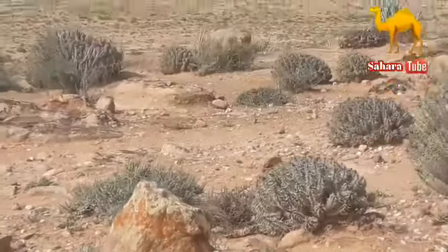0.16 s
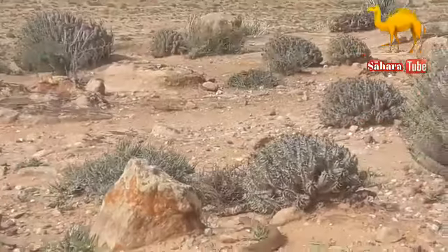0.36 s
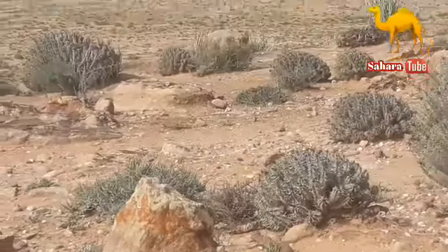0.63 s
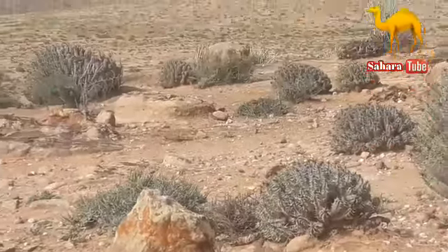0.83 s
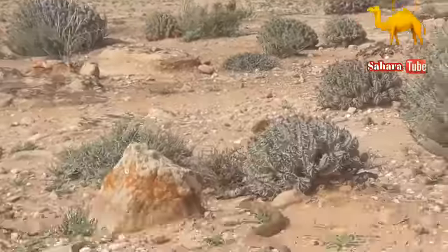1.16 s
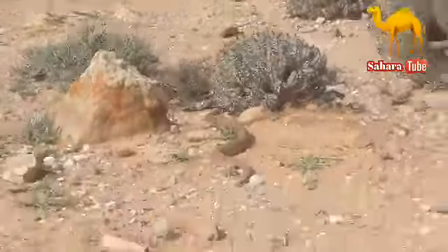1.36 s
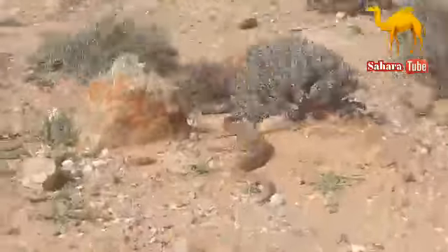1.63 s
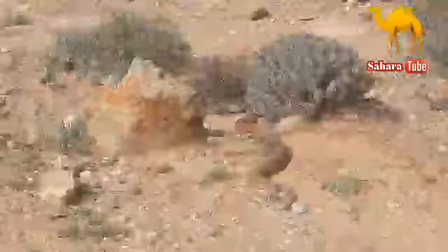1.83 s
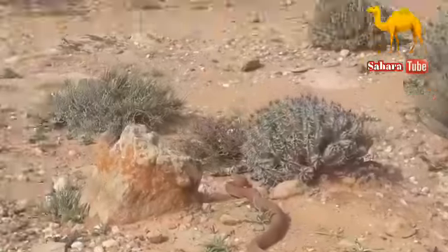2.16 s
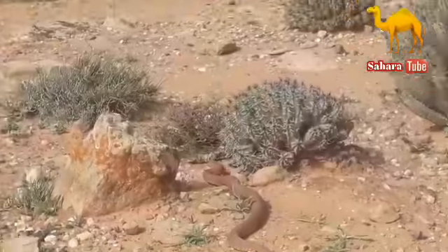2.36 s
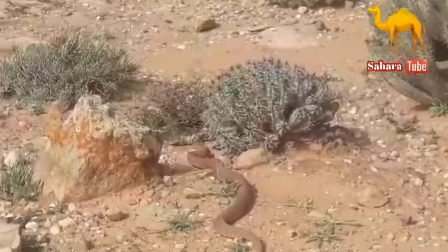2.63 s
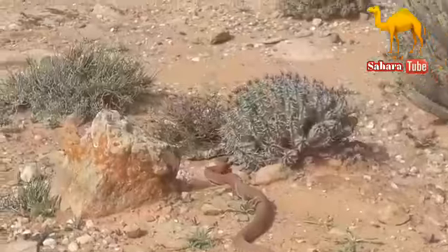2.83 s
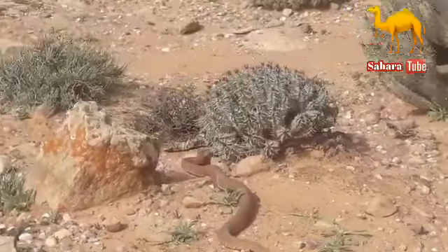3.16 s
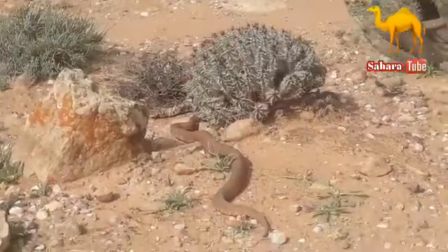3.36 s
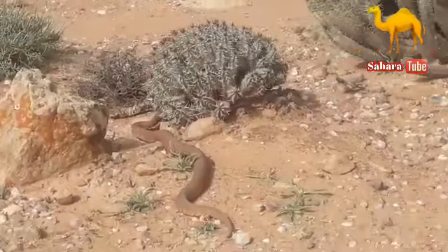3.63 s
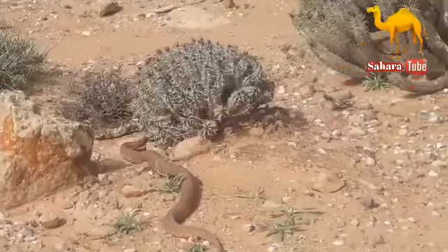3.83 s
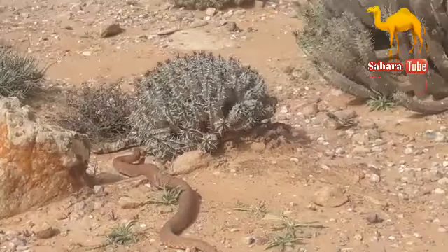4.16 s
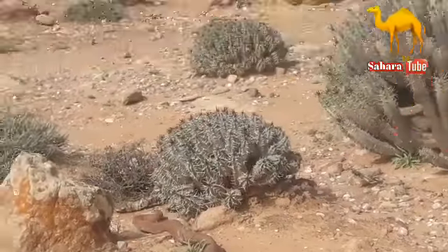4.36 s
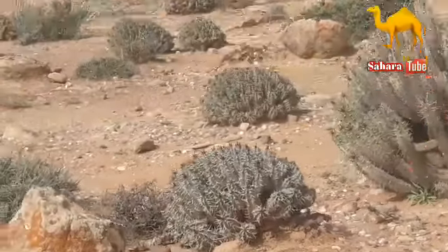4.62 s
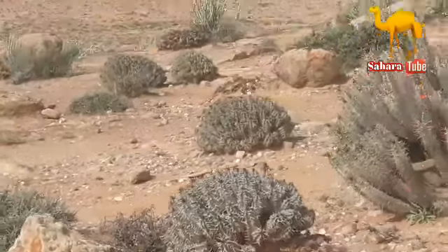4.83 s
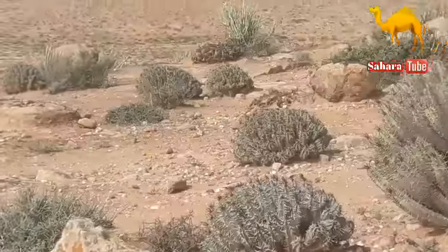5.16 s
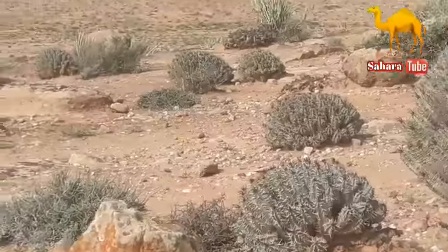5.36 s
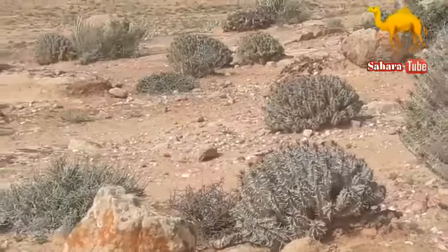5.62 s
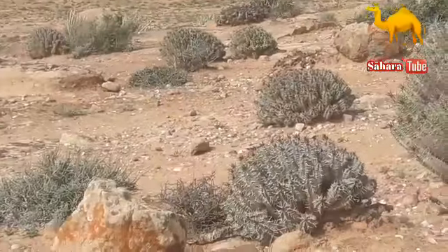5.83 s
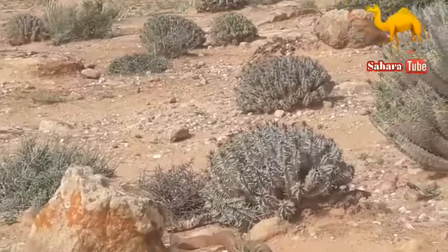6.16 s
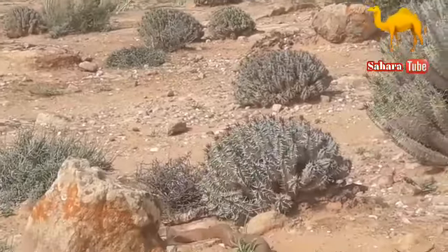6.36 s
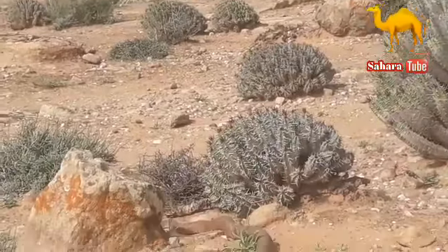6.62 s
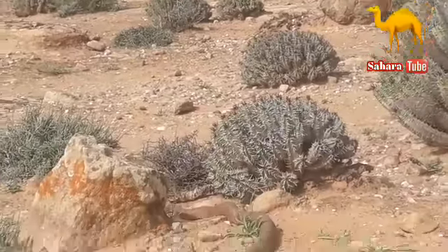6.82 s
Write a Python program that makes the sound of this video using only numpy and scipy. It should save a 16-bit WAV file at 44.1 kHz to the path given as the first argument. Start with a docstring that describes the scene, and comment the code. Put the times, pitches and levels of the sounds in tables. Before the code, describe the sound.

Outdoors on open stony ground, a snake lets out a loud, high, rasping hiss that swells quickly, throbs rapidly and fades. After a short gap a second, softer and lower hiss does the same. Wind rumbles in gusts on a hand-held microphone, fingers knock dully on the camera body, and faint high pips chirp beneath. Wind and a last run of knocks remain.

```python
"""Outdoors on stony ground, a hand-held camera's microphone over its own faint steady hiss, in gusting wind.
Tiny ticks and the first finger knocks on the camera body come early, as a high rasping hiss swells:
band-shaped noise plus narrow noise resonances that sink, throbbing about 23 times a second.
Faint gliding pips join it halfway and go on as it fades and a second, lower burst swells and fades.
Wind, microphone hiss and a last run of knocks remain."""
import sys
import numpy as np
from scipy import signal
from scipy.fft import rfft, irfft, next_fast_len
from scipy.io import wavfile

SR = 44100
rng = np.random.default_rng(int(sys.argv[2]) if len(sys.argv) > 2 else 0)


def dump(signal):
    """Clip the signal to [-1, 1] and save it as 16-bit WAV at the path in sys.argv[1]."""
    limited = np.clip(np.atleast_2d(signal).T, -1, 1)
    pcm = np.round(limited * 32767).astype(np.int16)
    wavfile.write(sys.argv[1], SR, pcm)


N = 307818   # samples, just under 7 s

# Noise of the electronics: freq_hz, density_db (per Hz, relative)
SELF_NOISE = [(410, -52), (700, -15.5), (968, -15), (1210, -13.5), (1810, -8.5), (2030, -9), (3550, -9),
              (3880, -11.5), (7830, -25), (14400, -13), (15700, -14)]
SELF_NOISE_DB = -80.5   # rms

# Wind rumble on the microphone over time: start_s, level_db
WIND = [(0, -72.5), (.4, -65), (.66, -51), (.85, -66.5), (1.05, -63), (1.26, -55), (1.48, -49.5),
        (1.65, -56), (1.8, -67), (2.05, -64.5), (2.18, -58.5), (2.6, -70.5), (3.15, -72.5), (3.36, -57.5),
        (3.55, -68.5), (3.83, -58.5), (3.96, -51), (4.15, -48.5), (4.35, -68), (4.57, -54.5), (4.7, -62),
        (4.85, -52.5), (5.05, -65.5), (5.9, -70.5), (6.98, -79.5)]
# Deep pressure swings over time: start_s, level_db
SWINGS = [(0, -85.5), (.4, -75.5), (1.1, -71), (1.75, -94.5), (2.2, -67), (3.0, -86.5), (4.4, -77.5),
          (5.25, -61), (6.1, -100), (6.98, -102)]
# Spectra of the wind's rumble, flutter and deep swings: freq_hz, density_db (per Hz, relative)
RUMBLE = [(30, -31.5), (45, -17.5), (65, -4), (100, -4.5), (150, -7.5), (250, -19.5), (400, -41)]
FLUTTER = [(100, -27.5), (200, -2.5), (400, -6), (800, -15), (1500, -23), (2500, -33.5)]
DEEP = [(10, -2.5), (30, 4.5), (45, -18.5), (70, -42)]
FLUTTER_DB, FLUTTER_FOLLOWS = -69, 0.28   # level at mean wind; share of the rumble's swing in dB

# Finger knocks on the camera body: start_s, level_db, brightness_db_per_octave, lowest_mode_extra_db
KNOCKS = [(0.174, -60.5, 4.5, -3.5), (0.178, -41, -0.7, -4), (1.485, -44.5, 0.8, -5),
          (1.628, -43.5, 1.5, 4), (1.642, -44, 1.5, -1), (2.048, -42.5, -0.5, -1), (2.063, -48, 2.5, 6),
          (2.070, -49.5, -0.5, 4), (2.251, -43.5, 1.5, 3), (2.484, -45, -2.3, -7.5),
          (3.4, -45.5, 0.5, -0.5), (3.444, -44, 1, -4), (6.045, -41.5, 1.3, 0.5), (6.064, -47.5, 1.5, -13),
          (6.098, -53.5, 3.5, 11), (6.11, -56.5, 3.5, -3), (6.215, -47.5, 1, 4), (6.249, -49.5, 1.3, -1),
          (6.375, -47, 0.8, -5), (6.416, -47, 0.3, -2), (6.494, -48, 0, -2), (6.74, -44, 0.5, -2.5)]
# Modes of the camera body: freq_hz, level_db (relative), t60_s
BODY = [(109.8, 6.5, 0.142), (258.6, 4, 0.036), (367.5, 1, 0.045), (451, 3, 0.032), (669, 1, 0.022),
        (923, 1.5, 0.0072), (1300, -2.5, 0.00538), (2420, -13.5, 0.0037), (4560, -16, 0.002)]

# Tiny ticks nearby: start_s, peak_db, pitch_hz
TICKS = [(0.054, -62, 2400), (0.0735, -67, 3140), (0.268, -63, 2370)]

# Faint pips under the hiss: time_s (just after the onset), peak_db, pitch_hz (mid-glide)
PIPS = [(1.3553, -68, 3456), (1.5738, -70, 3555), (1.6013, -63.5, 3380), (2.0562, -73, 3350),
        (2.1929, -73.5, 3562), (2.28, -79, 3400), (2.4259, -79, 3480), (3.7294, -73, 3500),
        (3.9579, -75.5, 3490), (4.2423, -66, 3490), (4.3296, -66, 3430), (4.4737, -65, 3338),
        (4.558, -67, 3606), (4.6089, -67, 3488), (4.655, -67.5, 3580), (4.7257, -66, 3470),
        (4.8539, -64.5, 3577), (4.9591, -64.5, 3502), (4.9861, -65.5, 3440), (5.0774, -66, 3346),
        (5.1597, -65, 3400), (5.245, -69, 3340), (5.3547, -71.5, 3420), (5.3744, -71, 3380),
        (5.414, -75, 3370), (5.4705, -72.5, 3540), (5.516, -71.5, 3820), (5.6057, -72, 3480),
        (5.674, -78, 3530), (5.763, -77, 3470), (5.83, -79, 3520)]
PIP_S, PIP_GLIDE_HZ = 0.042, 60   # length; total rise in pitch

# Each hiss burst: lowest_start_hz, lowest_end_hz, lowest_db, rush_db (both against the effort),
# tilt_start_db_per_octave, tilt_end_db_per_octave (brightness of the rush)
BURSTS = [(6460, 6240, -3.5, -7, -10, -5), (6095, 5730, -8, -8.5, 0.5, 1)]
# Effort, one list per burst: start_s, level_db, then against it middle_db, top_db, late_low_db
EFFORT = [
    [(.06, -75, 3.5, -22, -16), (.16, -60, 0, -5.5, -22), (.42, -39.5, -3, -4, -9),
     (.62, -31, -15, -14.5, -7.5), (.73, -25.5, -29, -5, -9.5), (.86, -33, -9, -6, -6.5),
     (.96, -26.5, -13, -3.5, -9.5), (1.2, -28.5, -9, -12, -11), (1.45, -30, -12.5, -13, -6.5),
     (2.05, -36.5, -5.5, -16.5, -4), (2.45, -47, -4.5, -26, -3), (2.62, -56, -4, -20.5, -5.5),
     (2.69, -87, -0.5, -20, -8)],
    [(3.55, -74, -8, -10, -21), (3.63, -47.5, -6, -16, -22), (3.82, -41.5, -6.5, -25, -17.5),
     (4.19, -33, -5, -25, -5.5), (4.32, -36, -1.5, -22, -11.5), (4.42, -33.5, -4.5, -25, -0.5),
     (4.9, -36, -5.5, -33.5, 1), (5.4, -41.5, -3.5, -30.5, 1), (5.75, -46, -6, -30, 5.5),
     (5.98, -60, -4, -16, -2), (6.09, -84, -11, -18, -12)],
]
# Whistles, one list per burst: end_hz, sinking (exponent against the lowest), width_hz, level_db,
# level_column (rounded: 0 lowest, 1 middle, 2 top, 3 rush, 4 late low), waver_db
WHISTLES = [
    [(6390, 0.27, 50, -1.5, 2, 0.5), (6225, .25, 89, -3.5, 4, 1), (5170, 0.13, 30, -19.5, 0, 5),
     (9340, 1.25, 190, -12.5, -0.5, 2), (9104, 2.3, 100, -8, 1, 3.5), (13320, 0.42, 67, -2, 2, 1.5),
     (13250, .55, 480, -11, 3, 2.5), (14180, 1.08, 148.2, -17.5, 2, 4.5)],
    [(5714, 0.82, 140, -1.5, 0, 1), (5154, 0.16, 78, -11.5, 0, 0.5), (4834, .3, 60, -16, 4, 5),
     (4350, 0.23, 57, -22, 4, 8.5), (8665, 0.74, 174, 0, 1, 1), (13630, .7, 180, -23, 2, -5)],
]
# Spectrum of the broad rush, one list per burst: freq_hz, density_db (per Hz, relative)
RUSH = [
    [(5000, -64), (5350, -25), (5600, -13), (6000, -11.5), (6600, -6), (7200, -8), (9100, -10.5),
     (9800, -6.5), (11500, -8.5), (13000, -6.5), (14200, -15), (15300, -17), (15750, -29.5)],
    [(4900, -68.5), (5350, -18.5), (5500, -33), (5700, -5), (6500, -4.5), (7300, -13), (8100, -18.5),
     (8700, -8), (9400, -2.5), (12300, -8.5), (12600, -11.5), (13300, -8), (15800, -16)],
]
# Lower edge of each burst, cut steeply below: edge_hz
LOW_EDGE_HZ = [4510, 4300]
WANDER_HZ_PER_DB = 20   # pitch wander for each dB of waver above 2 dB
FIRST_THROB_S, THROB_S = 0.0755, 0.043565   # one steady beat through both bursts
THROB_SCATTER_DB = 1.05   # spread in strength from throb to throb

SIDE_DB = -45.5   # middle level of the part that differs between the channels
STOP_HZ = 15860   # the recorder passes almost nothing above this


def from_db(db):
    """Gain of a level in dB."""
    return 10 ** (np.asarray(db) / 20)


def rms_one(x):
    """Scaled to rms 1."""
    return x / np.sqrt(np.mean(np.abs(x) ** 2) + 1e-20)


def in_time(rows):
    """Every column of a curve table, joined by straight lines, sample by sample."""
    s, *columns = np.transpose(rows)
    t = np.arange(N) / SR
    return [np.interp(t, s, column) for column in columns]


def drift(rate_hz):
    """Slow chance: noise twice through a one-pole low-pass, run in for a second; spread 1."""
    r = np.exp(-2 * np.pi * rate_hz / SR)
    noise = rng.standard_normal(N + SR)
    return rms_one(signal.lfilter([1], [1, -2 * r, r * r], noise)[SR:])


def coloured(spectrum):
    """Noise with the given spectrum, silent outside it; rms 1."""
    size = next_fast_len(N)
    hz = np.arange(1, size // 2 + 2) * SR / size
    at_hz, db = np.transpose(spectrum)
    gain = from_db(np.interp(np.log(hz), np.log(at_hz), db, left=-200, right=-200))
    return rms_one(irfft(rfft(rng.standard_normal(size)) * gain, size)[:N])


def ring(clicks, hz, t60_s):
    """A struck mode: each unit click starts a sine of height 1 that falls by 60 dB in t60_s."""
    r = from_db(-60 / (t60_s * SR))
    w = 2 * np.pi * hz / SR
    # the tiny offset keeps the filter clear of slow denormal numbers
    return signal.lfilter([0, np.sin(w)], [1, -2 * r * np.cos(w), r * r], clicks + 1e-18)


def electronics():
    """Microphone electronics: steady faint coloured noise."""
    return from_db(SELF_NOISE_DB) * coloured(SELF_NOISE)


def wind():
    """Gusts at the microphone: lumpy rumble, a lighter flutter that shares its lumps, and deep swings."""
    (rumble_db,), (deep_db,) = in_time(WIND), in_time(SWINGS)
    lumps = drift(13.0)
    rumble = from_db(rumble_db + 1.8 * lumps) * coloured(RUMBLE)
    flutter_db = FLUTTER_DB + FLUTTER_FOLLOWS * (rumble_db - rumble_db.mean())
    flutter = from_db(flutter_db + 0.63 * lumps + 1.1 * drift(20)) * coloured(FLUTTER)
    deep = from_db(deep_db) * coloured(DEEP)
    return rumble + flutter + deep


def knocks():
    """Fingers on the camera: each knock strikes every body mode; a harder contact favours the high ones."""
    s, knock_db, bright_db, lowest_db = np.transpose(KNOCKS)
    at, out = np.round(s * SR).astype(int), np.zeros(N)
    spread_db = rng.normal(0, 1.5, (len(at), len(BODY)))
    spread_db[:, 0] += lowest_db
    for k, (hz, mode_db, t60_s) in enumerate(BODY):
        tilt_db = bright_db * np.log2(hz / 450)
        strike_db = knock_db + mode_db - 5 + tilt_db + spread_db[:, k]
        clicks = np.zeros(N)
        clicks[at] = from_db(strike_db) * (-1) ** k   # neighbouring modes start in opposite phase
        out += ring(clicks, hz, t60_s)
    # a small body radiates no deep bass
    return signal.sosfilt(signal.butter(2, 70.0, "high", fs=SR, output="sos"), out)


def ticks():
    """Tiny ticks nearby: one click each sets a single mode ringing, down 60 dB in 12 ms."""
    out = np.zeros(N)
    for s, db, hz in TICKS:
        click = 1.0 * (np.arange(N) == round(s * SR))
        out += from_db(db) * ring(click, hz, 0.012)
    return out


def pips():
    """Short soft-edged tones, rising a little in pitch, that creep in just before their stated time."""
    out, size = np.zeros(N), round(PIP_S * SR)
    for s, db, hz in PIPS:
        start = round(s * SR - 0.3 * size)
        pitch_hz = hz + PIP_GLIDE_HZ * np.linspace(-0.5, 0.5, size)
        tone = np.sin(2 * np.pi * np.cumsum(pitch_hz) / SR)
        out[start:start + size] += from_db(db) * np.hanning(size) * tone
    return out


def throbbing(sharpness, rest, lumpy_db):
    """The flow swells and sinks once per throb, never quite stopping, and is lumpy inside."""
    cycle = (np.arange(N) / SR - FIRST_THROB_S) / THROB_S
    which = np.round(cycle).astype(int) + 2   # throb number, from 0
    scatter_db = THROB_SCATTER_DB * rng.standard_normal(which.max() + 1)
    swell = rest + np.abs(np.cos(np.pi * cycle)) ** sharpness
    return swell * from_db(scatter_db[which] + lumpy_db * drift(90))


def patchy(x, edges_hz, tilt_db, patchy_db):
    """Split into bands that follow a moving tilt about 8 kHz and flicker each on their own."""
    hz, whole, out = np.arange(N // 2 + 1) * SR / N, rfft(x), np.zeros(N)
    for low, high in zip(edges_hz, edges_hz[1:]):
        band = irfft(whole * (hz >= low) * (hz < high), N)
        out += from_db(tilt_db * np.log2(high / 8000) + patchy_db * drift(17)) * band
    return out


def whistle(hz, width_hz):
    """Noise in a narrow moving resonance: slow complex noise carried on a gliding tone; rms 1."""
    r = np.exp(-np.pi * width_hz / SR)
    noise = rng.standard_normal(N) + 1j * rng.standard_normal(N)
    slow = signal.lfilter([1], [1, -r], noise)
    slow = signal.lfilter([1], [1, -r ** 4.8], slow)   # steeper skirts far from the centre
    carrier = np.exp(2j * np.pi * np.cumsum(hz) / SR)
    return rms_one(np.real(slow * carrier))


def hiss():
    """Two bursts on one throbbing flow, each a broad patchy rush with its own sinking, wavering whistles."""
    t, out = np.arange(N) / SR, np.zeros(N)
    flow = throbbing(sharpness=1.14, rest=0.11, lumpy_db=0.46)
    bands_hz = np.linspace(4000, 16000, num=9)
    for effort, shape, modes, rush, edge_hz in zip(EFFORT, BURSTS, WHISTLES, RUSH, LOW_EDGE_HZ):
        start_hz, last_hz, lowest_db, rush_db, *tilts_db = shape
        span = effort[0][0], effort[-1][0]
        effort_db, middle_db, top_db, late_db = in_time(effort)
        levels_db = lowest_db, middle_db, top_db, rush_db, late_db
        above_end = np.interp(t, span, (start_hz / last_hz, 1))   # lowest pitch over its end pitch
        tilt_db = np.interp(t, span, tilts_db)

        burst = from_db(rush_db) * patchy(coloured(rush), bands_hz, tilt_db, patchy_db=1.227)
        for end_hz, sinking, width_hz, db, column, waver_db in modes:
            gain = from_db(db + levels_db[round(column)] + waver_db * drift(18))
            wander_hz = WANDER_HZ_PER_DB * max(waver_db - 2, 0) * drift(6.5)
            burst += gain * whistle(end_hz * above_end ** sinking + wander_hz, width_hz)

        burst *= flow * from_db(effort_db) * (t > span[0]) * (t < span[1])
        out += signal.sosfilt(signal.cheby2(8, 50, edge_hz, "high", fs=SR, output="sos"), burst)
    return out


def scene():
    """All sources reach both channels almost alike; a weak, wavering copy 9 ms late differs in sign."""
    mid = electronics() + wind() + knocks() + ticks() + pips() + hiss()
    side = from_db(SIDE_DB + 4.7 * drift(7.9)) * np.roll(mid, 400)
    return np.array([mid + side, mid - side])


def record(dry):
    """The top is cut steeply, to 60 dB down at STOP_HZ."""
    return signal.sosfilt(signal.cheby2(18, 60, STOP_HZ, fs=SR, output="sos"), dry)


dry = scene()
out = record(dry)
dump(out)
```